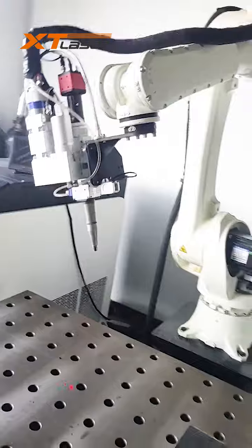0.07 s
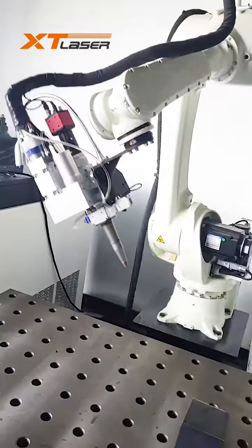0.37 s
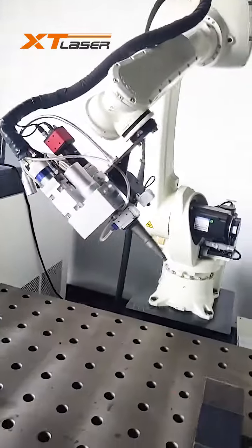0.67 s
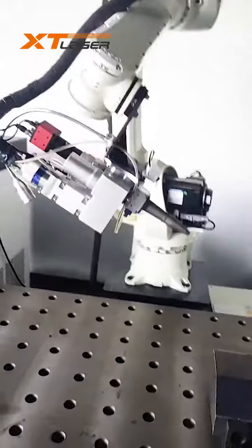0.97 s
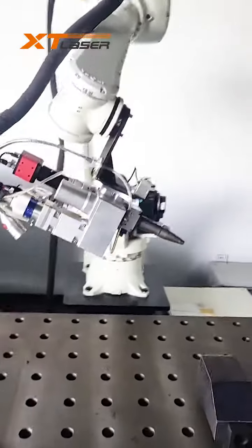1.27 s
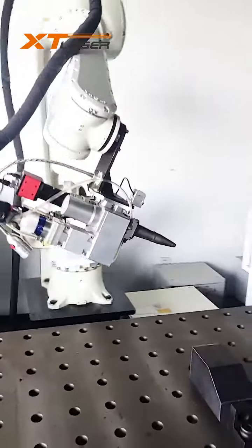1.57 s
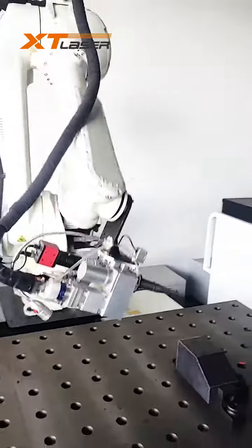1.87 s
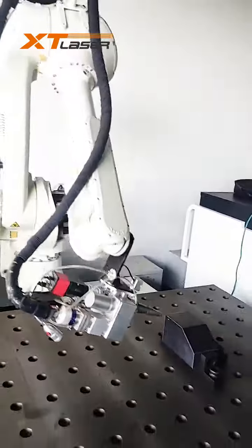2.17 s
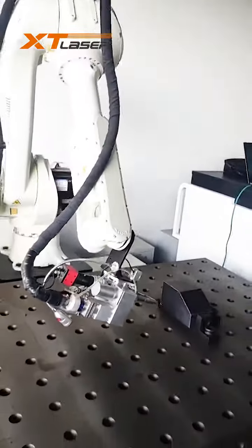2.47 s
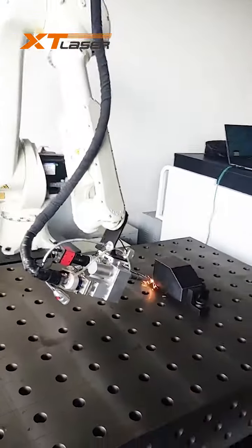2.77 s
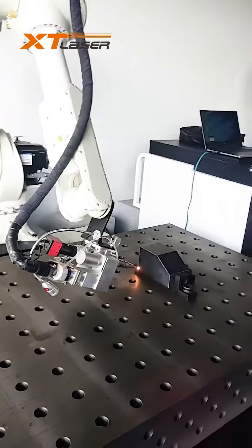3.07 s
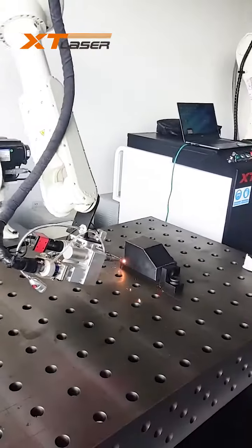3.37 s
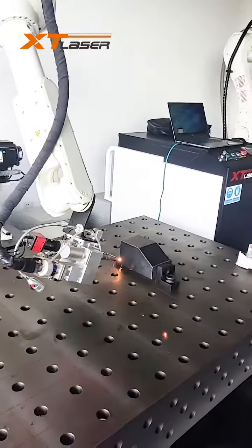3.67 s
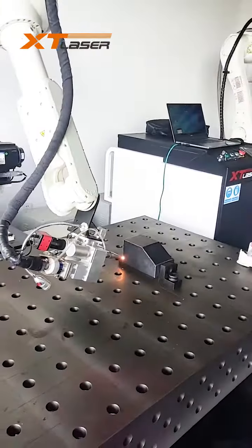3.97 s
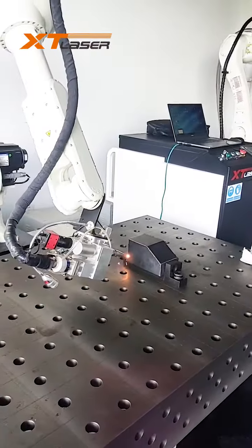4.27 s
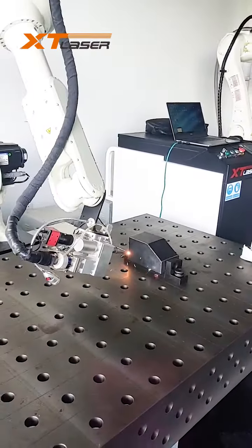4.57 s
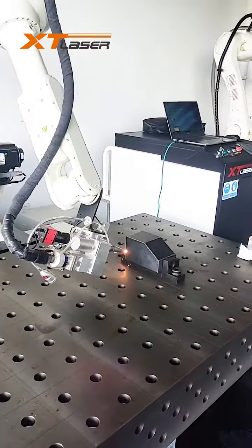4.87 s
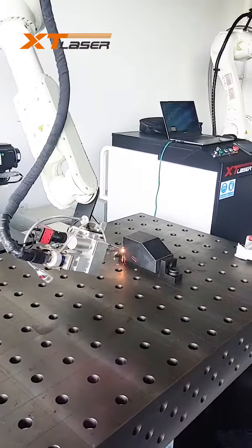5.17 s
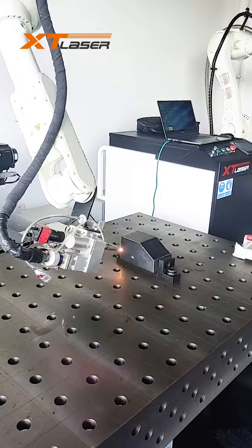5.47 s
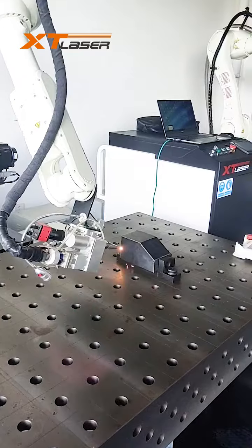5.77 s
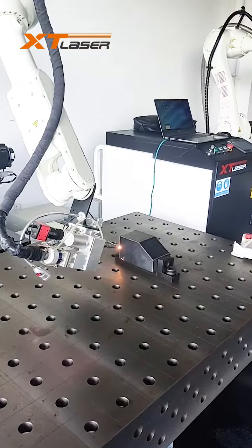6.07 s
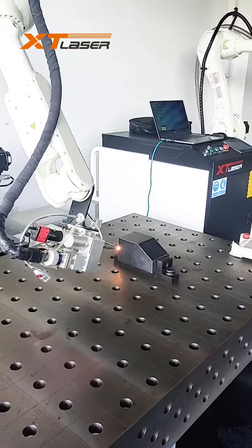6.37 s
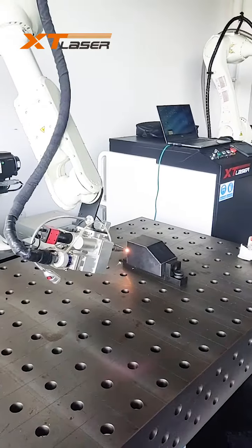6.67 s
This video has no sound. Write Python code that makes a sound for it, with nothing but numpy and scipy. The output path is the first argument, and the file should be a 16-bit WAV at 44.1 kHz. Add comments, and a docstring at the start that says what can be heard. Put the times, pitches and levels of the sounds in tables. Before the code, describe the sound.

Workshop fans and a chiller hum throughout, growing slightly as the microphone is carried toward a steel table. A robot arm speeds up with a soft gear rumble and a rising servo whine, while its laser head gives a thin gas hiss and faint puffs. Short, sharp, slightly metallic hisses break out at about 1.0, 1.3 and 1.7 seconds, with a faint, very high whistle bending around 1.5. The loudest burst comes at 1.9 seconds, with a brief sinking low tone beneath it. Around 2.5 seconds the jet lands on the workpiece with a surge, and the arm's whine drops and fades. From 2.6 seconds the laser melts metal with a steady, very high, finely buzzing sizzle over rushing gas and thin, wavering ringing tones. It flares gently, spits briefly near 4 seconds and continues until the end at about 7 seconds.

```python
"""A laser head blows gas and melts metal as a robot arm swings it over a steel table.
The turbulent jet flares into hisses where it sweeps across edges and holes, then settles on the workpiece
and rings a hollow there. The laser spot sizzles, throbbing at twice the mains frequency.
Gears and servos sound with the arm; workshop fans and a chiller hum behind. A microphone with two ports
hears it all while it is carried up to the table."""
import sys
import numpy as np
from scipy import signal
from scipy.fft import rfft, irfft
from scipy.io import wavfile
from scipy.ndimage import map_coordinates

SR = 44100
rng = np.random.default_rng(int(sys.argv[2]) if len(sys.argv) > 2 else 0)


def bounce(signal):
    """Save signal as a 16-bit WAV file at the path given by the first command-line argument."""
    frames = np.transpose(np.atleast_2d(signal))
    limited = np.clip(frames, -1, 1)
    pcm = np.round(limited * 32767).astype(np.int16)
    wavfile.write(sys.argv[1], SR, pcm)


N = 300762
T = np.arange(N) / SR
F = np.maximum(np.arange(N // 2 + 1) * SR / N, 1)

THROB_HZ = 99.9  # twice the mains frequency
LAND_S, SETTLE_S = 2.446, 0.22  # the jet settles on the workpiece
DIRECT_SHARE = 0.19  # coherence of the ports for sound straight from the workpiece


def undb(db):
    """Amplitude ratio of a level: tenfold per 20 dB."""
    return 10 ** (np.asarray(db) / 20)


def ramp(start_s, length_s):
    """Linear rise from 0 to 1."""
    return np.clip((T - start_s) / length_s, 0, 1)


def swell(middle_s, half_s):
    """Gaussian pulse of height 1."""
    return np.exp(-np.minimum(((T - middle_s) / half_s) ** 2, 50))


def swells(table):
    """Gaussian pulses added in amplitude; rows are t/s, half length/s, level/dB."""
    return sum(undb(db) * swell(s, half) for s, half, db in table)


def swings(table):
    """Gaussian pulses added in decibels; rows are t/s, half length/s, change/dB."""
    return sum(db * swell(s, half) for s, half, db in table)


def walk(rate_hz):
    """Random fluctuation: low-pass noise of unit variance."""
    x = irfft(rfft(rng.standard_normal(N)) / (1 + (F / rate_hz) ** 4), N)
    return x / x.std()


def colour(points):
    """Spectral envelope through points of f/Hz, level/dB."""
    hz, db = np.transpose(points)
    return undb(np.interp(np.log(F), np.log(hz), db))


def resonance(hz, width_hz):
    """Lorentzian peak, its skirts fading within half an octave."""
    skirts = 1 + (np.log2(F / hz) / .2) ** 4
    return 1 / np.sqrt((1 + (2 * (F - hz) / width_hz) ** 2) * skirts)


def modes(table):
    """Incoherent modes add in power; rows are f/Hz, width/Hz, level/dB."""
    return np.sqrt(sum((undb(db) * resonance(hz, width)) ** 2 / width for hz, width, db in table))


def port_gains():
    """Acoustic shadow: the right port is shaded, most in the treble."""
    # left port over right: f/Hz, level/dB
    shadow = [(60, -5.5), (110, 0.5), (200, 1.2), (380, 4.5), (700, 2.5), (1290, 5), (2400, 4.5), (3400, 5),
              (4400, 6), (5000, 6.5), (5600, 11), (6200, 7.5), (7300, -0.5), (8400, 0), (10000, 5.5),
              (11000, 7.5), (11600, 12.5), (12700, 17), (13400, 13.5), (14100, 14), (15000, 8.5)]
    return colour(shadow) ** np.array([[.5], [-.5]])


def turbulence(gain, direct=0, coherent_below_hz=430, port_lag_s=.0008):
    """Unit noise in a diffuse field, coherent in the bass; a direct share reaches the right port first."""
    coherence = 1 / (1 + (F / coherent_below_hz) ** 3)
    mid, side = rfft(rng.standard_normal((2, N)))
    left, right = mid * np.sqrt(1 + coherence) + side * np.sqrt(1 - coherence) * np.array([[1], [-1]])
    share = direct * (1 - coherence)
    right = np.sqrt(1 - share ** 2) * right + share * left * np.exp(2j * np.pi * F * port_lag_s)
    x = irfft(np.array([left, right]) * gain * port_gains(), N)
    return x / x.mean(axis=0).std()


def tone(hz):
    """Unit sinusoid at both ports: phase is the integral of frequency."""
    gains = port_gains()[:, np.searchsorted(F, np.mean(hz)), None]
    cycles = np.cumsum(hz * np.ones(N)) / SR + rng.random()
    return np.sqrt(2) * np.sin(2 * np.pi * cycles) * gains / gains.mean()


def fans(level_db=-40):
    """Turbulent air from the workshop fans radiates broadband noise."""
    # fan noise: f/Hz, relative density/dB
    spectrum = [(25, -52), (43, -21.5), (70, -13.5), (130, -8.5), (200, -6.5), (280, -7.5), (420, -9),
                (800, -14), (1250, -16), (2770, -22.5), (6000, -36), (7200, -107), (9000, -74),
                (15500, -86)]
    return turbulence(colour(spectrum)) * undb(level_db + 0.06 * walk(2.6))


def machine_hum(chiller_hz=118.1, drone_db=-42.5, mains_db=-45.5, approach_s=2.75):
    """Motor, chiller and mains tones, mostly growing louder as the microphone nears;
    the chiller's drone dips and swells."""
    # fan and pump tones: f/Hz, level/dB, loss when far/dB
    motor_tones = [(200.2, -47.5, 2.5), (208.6, -55, 1), (299.6, -53, 4), (403, -57.5, 7), (421, -49, -0.5),
                   (888, -60.5, 4)]
    # compressor harmonics beside the drone on the second: multiple, level/dB, loss when far/dB
    harmonics = [(1, -50, 5), (3, -48.5, 14), (4, -54, 6), (5, -55.5, 1), (6, -54, 11), (7, -60, -0.5),
                 (8, -69, 2)]
    # dips and swells of the drone alone: t/s, half length/s, change/dB
    drone_swings = [(1.5, 0.28, -5.5), (1.98, 0.2, 5), (2.702, 0.33, 2.5)]
    speed = 1 + 0.0012 * walk(2.77)
    far = 1 - ramp(0, approach_s)
    lines = motor_tones + [(k * chiller_hz, db, loss) for k, db, loss in harmonics]
    hum = sum(tone(hz * speed) * undb(db - loss * np.sqrt(far) + 1.8 * walk(3)) for hz, db, loss in lines)
    mains = tone(THROB_HZ) * undb(mains_db - 10.5 * far ** 1.05)
    drone = tone(2 * chiller_hz * speed) * undb(drone_db + swings(drone_swings))
    return hum + mains + drone


def servo_drives(hz=8000, line_db=-69, buzz_db=-73):
    """Switching in the drives radiates a faint spectral line within a band of buzz."""
    return tone(hz) * undb(line_db) + turbulence(resonance(hz, width_hz=300)) * undb(buzz_db)


def arm(creep_hz=1391, cruise_hz=1786, creep_db=-47, cruise_db=-40, base_hz=119.6):
    """Rotating machinery: gear noise and wrist whine follow the speed; the base motor hums as it turns."""
    # gear rumble: f/Hz, relative density/dB
    gear_spectrum = [(60, -28), (130, 4.5), (200, -5.5), (430, 4), (580, -1), (750, -13), (1500, -9),
                     (3000, -14), (6000, -24.5), (9000, -53)]
    # turns of the base joint: t/s, half length/s, level/dB
    base_turns = [(.95, 0.51, -48), (2.48, 0.37, -43.5)]
    speed = ramp(0, 0.89) - ramp(2.25, .75)  # speeds up, cruises, brakes to a creep
    hz = creep_hz + (cruise_hz - creep_hz) * speed
    db = creep_db + (cruise_db - creep_db) * speed ** 6.5
    whine = tone(hz) * undb(-18 + 3 * walk(24))
    mesh = tone(hz / 3) * undb(-13 + 3 * walk(8))
    base = tone(base_hz * (1 + 0.025 * walk(6.1))) * swells(base_turns)
    return (turbulence(colour(gear_spectrum)) + whine + mesh) * undb(db) + base


def free_jet(open_db=-61.5, added_near_db=-67):
    """Turbulent mixing: the jet hisses thinly, puffs over the table and gains a little at the part."""
    # jet noise: f/Hz, relative density/dB
    spectrum = [(800, -51), (3000, -8), (5800, 7), (7000, -19), (9000, -28), (10300, 10), (11000, 8),
                (12700, 16), (14000, 10), (15500, 6)]
    # the jet brushes the table: t/s, half length/s, level/dB
    puffs = [(.235, .05, -57), (.495, 0.029, -67), (.655, 0.038, -61), (.80, 0.071, -51), (.9, 0.096, -57)]
    flow = undb(open_db) + swells(puffs) + undb(added_near_db) * ramp(LAND_S, SETTLE_S)
    return turbulence(colour(spectrum)) * flow


def edge_tone(start_s=1.405, peak_s=1.553, end_s=1.615, steady_hz=12420, bend_hz=2400):
    """The jet oscillates across a sharp edge: an unsteady whistle that bends up, then back as it fades."""
    rise_s, fall_s, fade_s = .085, .055, .015
    rising, falling = ramp(peak_s - rise_s, rise_s), ramp(peak_s, fall_s)
    bend = np.sin(np.pi / 2 * rising) ** 1.5 * np.cos(np.pi / 2 * falling)
    sounding = ramp(start_s, fade_s) - ramp(end_s - fade_s, fade_s)
    db = -49 - 11 * falling + 3 * walk(60)
    hz = (steady_hz + bend_hz * bend) * (1 + .006 * walk(200))
    return tone(hz) * sounding * undb(db)


def hoot(start_s=1.88, from_hz=170, to_hz=114.6, sink_s=0.154, rise_s=0.043, fade_s=.17):
    """A low tone under the strongest hiss, rough by random modulation, sinks as the nozzle closes in."""
    age = np.maximum(T - start_s, 0)
    hz = to_hz + (from_hz - to_hz) * np.exp(-age / sink_s)
    envelope = ramp(start_s, rise_s) * np.exp(-np.maximum(age - rise_s, 0) / fade_s)
    return tone(hz * (1 + 0.041 * walk(31))) * envelope * undb(-41 + 7 * walk(25))


def ring_on(envelope, t60_s, stored=0.34):
    """Reverberation: the room or the steel stores a share of the power and releases it exponentially."""
    decay = np.exp(-np.log(1e6) / (t60_s * SR))
    tail = signal.lfilter([1 - decay], [1, -decay], envelope ** 2)
    return np.sqrt((1 - stored) * envelope ** 2 + stored * tail)


def steel_ring(pitch_spread=.01):
    """Forced vibration of the steel under the jet; the pitch slides about as the nozzle travels."""
    # modes of the table and the head: f/Hz, width/Hz, relative level/dB
    steel_modes = [(554, 100, -4), (910, 31, -26), (1490, 640, -5), (2240, 250, -6), (2930, 240, -7),
                   (3150, 160, -22), (3890, 130, -13), (4050, 140, -10.5), (4790, 280, -7),
                   (5400, 700, -5.5), (5850, 110, -5.5), (6340, 200, -8)]
    ring = turbulence(modes(steel_modes))
    position = np.cumsum(1 + pitch_spread * walk(14))
    return np.array([map_coordinates(channel, [position], order=2, mode="mirror") for channel in ring])


def edge_bursts(treble_hz=9400, cavity_width_hz=150, rush_lag_s=0.0072):
    """Edge noise: each edge breaks the jet into a hiss with two cavity tones, a steel ring and a rush."""
    # the jet meets an edge: t/s, rise/s, fall/s, level/dB, then, with levels relative to that,
    # rush/dB, treble/dB, lower cavity f/Hz, level/dB, upper cavity f/Hz, level/dB
    edges = [(0.79, 0.12, 0.06, -51, -20, -8, 2920, -17, 4700, -12),
             (0.965, 0.017, 0.09, -31, -15, -3.5, 1560, -8.5, 3370, -9.5),
             (1.286, 0.068, 0.076, -35, -11, -1, 2920, -18, 3450, -17),
             (1.44, 0.025, 0.61, -49.5, -11, 0, 3020, -17, 3500, -20),
             (1.666, 0.022, 0.059, -38, -4, 1.5, 3000, -18, 3320, -7),
             (1.866, 0.06, 0.085, -25.5, -7, 2, 890, -11.5, 2600, -17),
             (2.247, 0.02, 0.053, -48, -21, -5, 2920, -17, 3300, -19),
             (2.501, 0.044, 0.1, -44.5, -1, 3, 2720, -9, 5270, -19),
             (3.962, 0.038, 0.025, -43, -6, 11, 2710, -4, 4900, -6)]
    # hiss at an edge: f/Hz, relative density/dB
    hiss_spectrum = [(150, -3), (400, 12.5), (1000, 8.5), (1600, 6.5), (3200, 7.5), (4700, 0.5), (5900, -8),
                     (7200, 1), (9000, -4), (10300, 2.5), (11500, 2), (12600, 6), (14000, 3.5), (15500, -3)]
    # low rush that builds a little later: f/Hz, relative density/dB
    rush_spectrum = [(50, -35), (110, -17), (160, 7), (300, 2), (700, -47), (1500, -3.5), (4000, -65)]
    hiss = turbulence(colour(hiss_spectrum))
    steel = undb(-4.5) * steel_ring()
    body = irfft(rfft(hiss) / (1 + (F / treble_hz) ** 4), N)
    rush = turbulence(colour(rush_spectrum))
    out = 0
    for s, rise, fall, db, rush_db, treble_db, lower_hz, lower_db, upper_hz, upper_db in edges:
        push = np.sqrt(ramp(s, rise)) * np.exp(-np.clip((T - s - rise) / fall, 0, 10) ** 2)
        in_room = ring_on(push, t60_s=0.89)
        brief = ring_on(push, t60_s=0.31)  # the room absorbs the treble sooner
        in_steel = ring_on(push, t60_s=0.71, stored=0.48)
        cavity = modes([(lower_hz, cavity_width_hz, lower_db), (upper_hz, cavity_width_hz, upper_db)])
        ring = turbulence(cavity) * np.hypot(undb(lower_db), undb(upper_db))
        treble = (hiss - body) * undb(treble_db)
        low = np.interp(T - rush_lag_s, T, in_room) * rush * undb(rush_db)
        out = out + undb(db) * (in_room * body + brief * (treble + ring) + in_steel * steel + low)
    return out * undb(0.45 * walk(40))


def gas_wash(level_db=-48, surge_db=5):
    """An impinging jet: gas rushes over the workpiece and surges once on landing."""
    # rush on the workpiece: f/Hz, relative density/dB
    spectrum = [(80, -11), (180, -33), (350, 29), (600, -18), (1000, 21), (1500, 1), (2000, 4.5),
                (3200, 11), (4500, 12), (5600, 11), (6400, 5.5), (7000, -81), (9000, -59)]
    return turbulence(colour(spectrum)) * undb(level_db + surge_db * swell(2.56, 0.23))


def airy_tone(hz, width_hz, db, lock_db=-47.5, pitch_pull=.007):
    """Lock-in: a narrow band of hiss when weak, a firmer, slightly higher whistle when strong."""
    locked = .9 / (1 + (width_hz / 110) ** 2) / (1 + undb(lock_db - db) ** 3)
    whistle = tone(hz * (1 + pitch_pull * locked) + .3 * width_hz * walk(width_hz / 2))
    breath = turbulence(resonance(hz, width_hz), DIRECT_SHARE)
    return (np.sqrt(locked) * whistle + np.sqrt(1 - locked) * breath) * undb(db)


def workpiece_ring(waver_db=1.04):
    """Resonance at the workpiece: each tone wavers on its own and swells if the jet catches it."""
    # ringing tones at the workpiece, with two faint narrow bands of hiss near 7.4 and 8.2 kHz:
    # f/Hz, width/Hz, level/dB
    bands = [(1455, 42.6, -55.5), (2716, 45, -55), (3838, 55, -53.5), (4966, 70, -55), (6110, 83.4, -55.5),
             (7360, 87, -64.5), (8240, 71, -65), (9540, 75, -66.5), (10560, 150, -62), (11500, 150, -55),
             (12670, 130, -47), (13580, 150, -51), (14880, 200, -50)]
    # the jet catches the tone nearest f: t/s, half length/s, f/Hz, rise/dB
    catches = [(2.7, 0.16, 4962, 15.5), (2.643, 0.0915, 6115, 9), (2.727, .2, 14880, 7),
               (2.62, 0.07, 11520, 9), (2.723, 0.2, 2716, 4), (2.8, 0.172, 12670, 3.5),
               (2.85, 0.33, 1455, 5.5), (2.68, 0.051, 3828, 4), (3.05, 0.171, 3828, 7),
               (3.35, 0.198, 3828, 5.5), (3.28, 0.611, 6115, 6.5), (3.5, .3, 11520, 3),
               (3.63, 0.1, 3828, 8), (3.84, 0.117, 3828, 10.5), (4.08, 0.11, 3828, 4.5),
               (4.4, 0.454, 4962, 3), (4.55, 0.22, 3828, 4.5), (4.95, 0.397, 12670, 3),
               (4.85, .35, 14880, 4), (6.103, 0.24, 4962, 5.5), (6.72, 0.263, 4962, 9.5)]
    pitches = np.array(bands)[:, 0]
    out = 0
    for hz, width, db in bands:
        caught = [(s, half, rise) for s, half, pitch, rise in catches
                  if pitches[np.argmin(abs(pitches - pitch))] == hz]
        out = out + airy_tone(hz, width, db + swings(caught) + waver_db * walk(7.4))
    return out


def table_reflection(direct, strength=.27):
    """Interference with the table's echo: a comb filter that slides as head and microphone move."""
    # lag of the echo: t/s, left delay/ms, right delay/ms
    delays = [(2.65, 0.606, 1.144), (2.9, 0.609, 1.095), (3.2, 0.607, 1.119), (3.5, 0.655, 1.152),
              (3.8, 0.644, 1.092), (4.1, 0.642, 1.09), (4.4, 0.654, 1.076), (4.65, 0.694, 1.065),
              (5.0, 0.677, 1.047), (5.3, 0.692, 1.014), (5.7, 0.71, 0.988), (6.0, 0.69, 0.996),
              (6.35, 0.674, 0.959), (6.75, 0.648, 0.957)]
    s, *lags_ms = np.transpose(delays)
    echo = [map_coordinates(channel, [(T - np.interp(T, s, ms) / 1000) * SR], order=3, mode="mirror")
            for channel, ms in zip(direct, lags_ms)]
    return (direct + strength * np.array(echo)) / np.hypot(1, strength)


def melt(strike_s=2.6, build_s=0.11, sizzle_db=-40, throb_depth=0.29):
    """Amplitude modulation: the melt sizzles, flares and spits, throbbing with the laser power."""
    # sizzle of the melt: f/Hz, relative density/dB
    spectrum = [(5000, -18), (7500, -40), (9000, -26), (10200, -0.5), (11000, -0.5), (11550, 3), (12000, 3),
                (12600, 6.5), (13300, 6.5), (14000, 2.5), (14900, 5), (15500, 4)]
    # flare-ups of the melt: t/s, half length/s, f/Hz, width/Hz, level/dB
    flare_ups = [(2.72, 0.17, 15100, 900, -42), (2.76, .1, 13350, 400, -51),
                 (3.17, 0.17, 13300, 800, -42.5), (3.96, 0.34, 12100, 900, -46),
                 (4.8, 0.3, 14600, 700, -46), (5.0, 0.59, 12500, 1790, -43.5),
                 (5.95, 0.35, 13100, 600, -50), (6.7, 0.22, 13300, 1200, -44), (6.5, 0.65, 6760, 300, -61)]
    throb = 1 + throb_depth * np.sin(2 * np.pi * THROB_HZ * T)
    spitting = undb(1.5 * walk(740) + 0.9 * walk(7))
    flares = sum(turbulence(resonance(hz, width), DIRECT_SHARE) * undb(db) * swell(s, half)
                 for s, half, hz, width, db in flare_ups)
    sizzle = turbulence(colour(spectrum), DIRECT_SHARE) * undb(sizzle_db)
    return table_reflection(sizzle + flares) * throb * spitting * ramp(strike_s, build_s)


def scene():
    """Superposition of the machinery, the sweeping jet and the work on the metal."""
    machinery = fans() + machine_hum() + arm() + servo_drives()
    jet = edge_tone() + free_jet() + edge_bursts() + hoot()
    workpiece = melt() + (gas_wash() + workpiece_ring()) * ramp(LAND_S, SETTLE_S)
    return machinery + jet + workpiece


def record(dry, open_s=.068, cutoff_hz=15480):
    """Band limiting: the input opens after a moment and a steep low-pass cuts the top."""
    low_pass = signal.ellip(10, .2, 80, cutoff_hz, fs=SR, output="sos")
    return signal.sosfilt(low_pass, dry * ramp(open_s, .002))


dry = scene()
out = record(dry)
bounce(out)
```